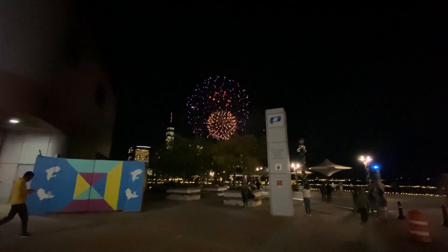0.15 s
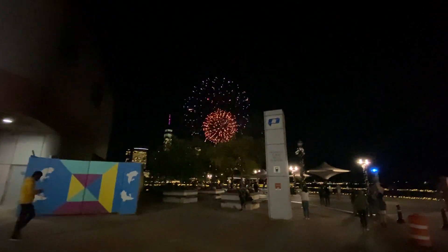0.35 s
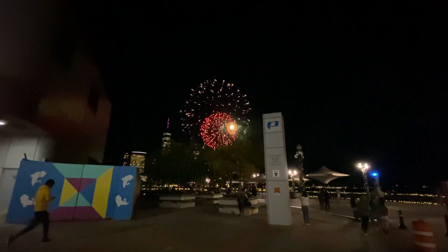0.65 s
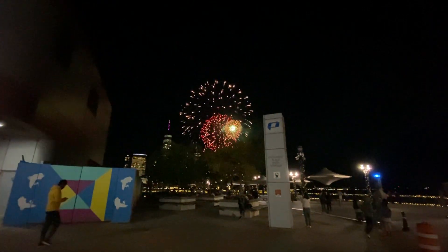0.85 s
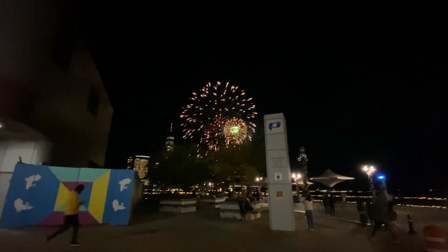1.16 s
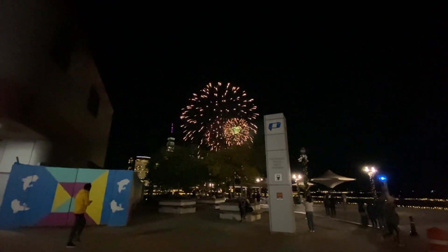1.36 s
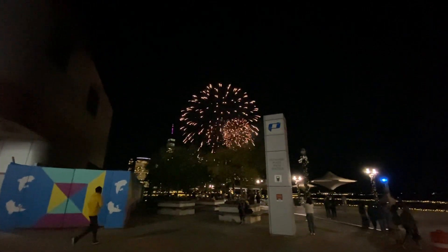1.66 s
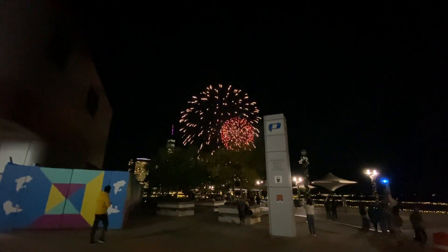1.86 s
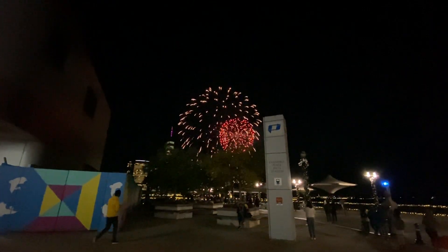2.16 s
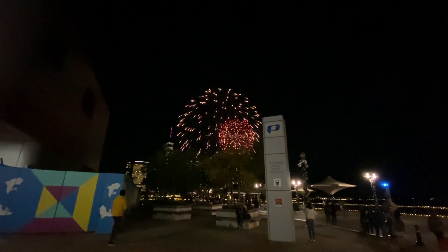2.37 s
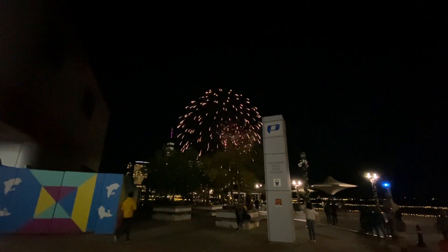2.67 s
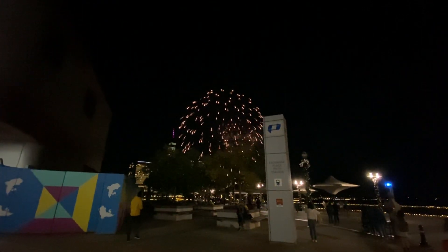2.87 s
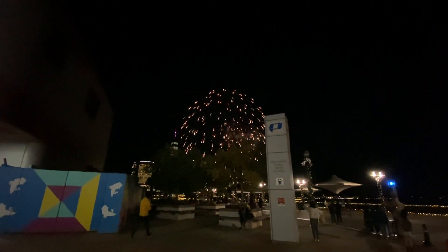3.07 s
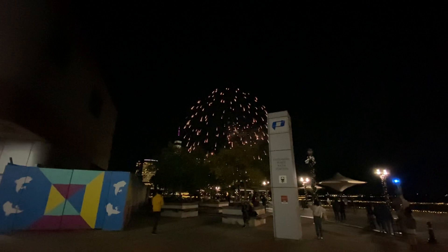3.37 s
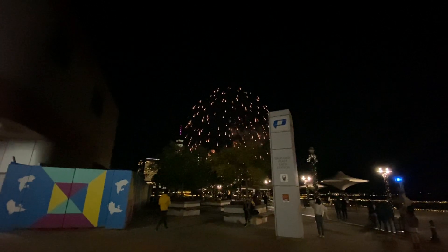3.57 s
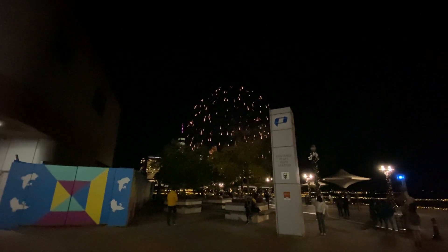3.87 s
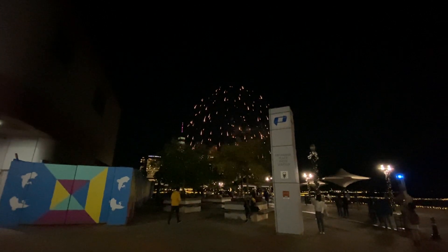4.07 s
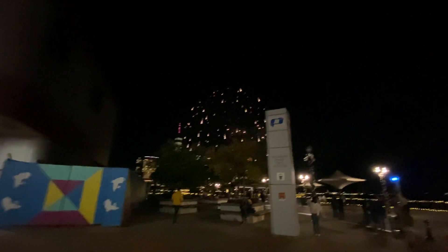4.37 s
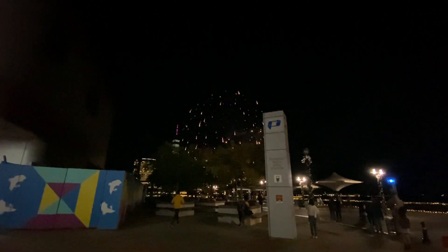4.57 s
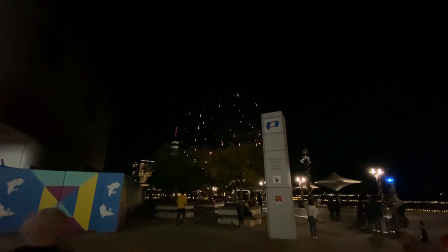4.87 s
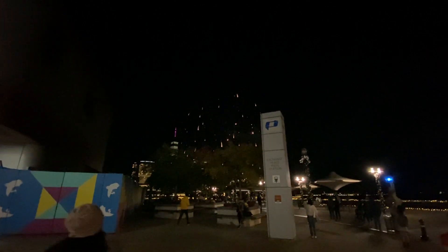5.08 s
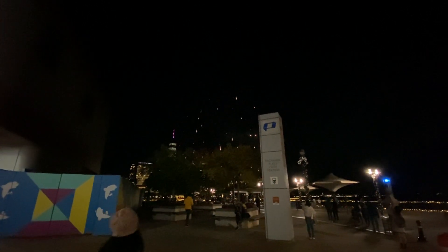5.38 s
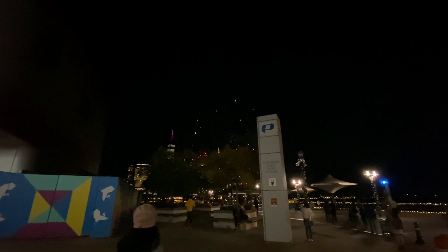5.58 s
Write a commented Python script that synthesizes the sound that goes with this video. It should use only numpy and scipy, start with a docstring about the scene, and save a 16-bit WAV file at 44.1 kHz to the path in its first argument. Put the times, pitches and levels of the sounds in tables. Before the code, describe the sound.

Distant firework shells crack and boom over an open waterfront at night, each slapping off nearby walls and rolling away in long dull rumbles.

```python
"""Distant fireworks over a city waterfront

Firework shells burst far off at night. Each shock is a pressure jump with a ragged tail and a bounce off
the pavement. It slaps back from three nearby walls and from far facades, then rolls round the skyline as
filtered noise that grows duller. Stray thuds and cracks, made like the shocks, stand out of the roll.
Under it lie city rumble and faint hiss (coloured noise), small ticks (noise puffs) and a thin squeal."""
import sys
import numpy as np
from scipy import signal
from scipy.fft import rfft, irfft
from scipy.io import wavfile

SR = 44100
rng = np.random.default_rng(int(sys.argv[2]) if len(sys.argv) > 2 else 0)


def wav_record(signal):
    """Record a signal, one row per channel, as 16-bit PCM in the file named by sys.argv[1]."""
    frames = np.transpose(np.atleast_2d(signal))
    bounded = np.clip(frames, -1, 1)
    # unit amplitude maps onto the largest positive 16-bit level
    quanta = np.round(bounded * 32767).astype(np.int16)
    wavfile.write(sys.argv[1], SR, quanta)


N = 252693
TIME = np.arange(N) / SR  # seconds
FREQS = np.maximum(np.fft.rfftfreq(N, 1 / SR), 1)  # Hz

# The shells: start_s, level_db, overpressure_ms, treble_edge_hz, extra_delay_of_far_echoes_s
BURSTS = [(0.211, -10.5, 3.2, 300, 0.0098), (0.8642, 6, 9.9, 7730, 0.017), (2.4698, 8.5, 2, 3700, 0.00075),
          (5.115, -11, 6.6, 1800, 0.0036), (5.185, 4.5, 1.17, 2060, 0.0046),
          (5.3804, 5.5, 0.84, 2300, 0.0082)]


def from_db(db):
    """Turn decibels into a gain."""
    return 10 ** (np.asarray(db) / 20)


def rms_one(x):
    """Scale a signal to an rms of 1."""
    return x / np.sqrt(np.mean(x ** 2) + 1e-20)


def at_hz(points, hz):
    """Read a table between its points, along a log-frequency axis."""
    table = np.array(points)
    return np.interp(np.log(hz), np.log(table[:, 0]), table[:, 1])


def cut(x, hz, kind, order=2):
    """Butterworth filter: "low" keeps the lows, "high" keeps the highs."""
    edge_hz = np.clip(hz, 10, .45 * SR)
    return signal.sosfilt(signal.butter(order, edge_hz, kind, fs=SR, output="sos"), x)


def bell(x, hz, gain_db, q):
    """Resonant filter that lifts or dips the sound around one pitch; a higher q is narrower."""
    w, height = 2 * np.pi * hz / SR, from_db(gain_db / 2)
    damping = np.sin(w) / (2 * q) * np.array([1, 0, -1])
    centre = np.array([1, -2 * np.cos(w), 1])
    return signal.lfilter(centre + damping * height, centre + damping / height, x)


def envelope(start_s, length_s, attack_s, release_s):
    """Rise, hold, then die away exponentially."""
    age = np.maximum(TIME - start_s, 0)
    rise = 1 - np.exp(-age / attack_s)
    return rise * np.exp(-np.maximum(age - length_s, 0) / release_s)


def wander(hz):
    """Random drift slower than hz, with a spread near 1 and limited to 2 either way."""
    return np.clip(rms_one(cut(rng.standard_normal(N), hz, "low")), -2, 2)


def add(out, sound, s, lag_ms=0, pan_db=0):
    """Mix in a short sound; positive lag makes the left later, positive pan makes it louder."""
    for channel, part, side in zip(out, sound * np.ones((2, 1)), (.5, -.5)):
        at = max(round((s + side * lag_ms / 1000) * SR), 0)
        channel[at:at + len(part)] += from_db(side * pan_db) * part[:max(N - at, 0)]


def spread(pair, colour):
    """Colour two unrelated noises and mix them as middle and side, giving a stereo spectrum."""
    # Stereo width: pitch_hz, side_against_middle_db
    width_table = [(60, -13.5), (120, -6), (250, -10.5), (500, 4), (1000, 8.5), (2000, 2), (4000, -0.5),
                   (9000, 0.5)]
    # Balance: pitch_hz, left_against_right_db
    lean_table = [(60, -7), (100, 2), (180, -1), (320, 2.5), (560, 3.5), (970, 5.5), (1700, 2), (2970, 1.5),
                  (5190, 2.5), (9060, 0.5)]
    mid, side = rfft(pair)
    width = from_db(at_hz(width_table, FREQS))
    gain = rms_one(from_db(at_hz(colour, FREQS)))
    field = np.array([mid + width * side, mid - width * side]) / np.hypot(1, width)
    lean = from_db(at_hz(lean_table, FREQS) * np.array([[.5], [-.5]]))
    return field * gain * lean


def background():
    """Broad noise whose level drifts makes the city rumble; treble noise that comes and goes is the hiss."""
    # City colour: pitch_hz, level_db per Hz
    city_colour = [(20, -17.5), (40, -4.5), (65, -1.5), (130, -2), (250, -11.5), (370, -14), (500, -19.5),
                   (800, -22), (1200, -30.5), (2100, -39), (3500, -49.5), (6000, -58), (9000, -64.5),
                   (13000, -67.5)]
    # Hiss colour: pitch_hz, level_db per Hz
    hiss_colour = [(2000, -32), (3500, -3), (5000, 4.5), (6300, -2.5), (7800, -1), (9000, -9.5),
                   (10500, -18), (15000, -22.5)]
    # Spells of hiss: start_s, length_s, level_db
    hiss_spells = [(0.177, 1.52, -66.5), (2.26, 1.1, -69.5), (4.078, 0.29, -62.5), (4.6, 3.3, -71)]
    city_db, surge_db, surge_hz = -32.5, 1.1, 4
    city = irfft(spread(rng.standard_normal((2, N)), city_colour), N)
    hiss = irfft(spread(rng.standard_normal((2, N)), hiss_colour), N)
    swells = 0
    for s, length_s, level_db in hiss_spells:
        swells = swells + from_db(level_db) * envelope(s, length_s, attack_s=0.046, release_s=0.15)
    return from_db(city_db + surge_db * wander(surge_hz)) * city + swells * hiss


def squeal(waver_rate_hz=70, waver_width_hz=60, flicker_db=3.0, flicker_hz=8, pan_db=-14):
    """One narrow, unsteady line on the right, as from a rubbing brake, creeping up in pitch and level."""
    start_s, length_s, fade_s = 4.08, .82, 0.027
    start_hz, rise_hz_per_s = 8620, 190
    start_db, rise_db_per_s = -83, 4.5
    age = np.clip(TIME - start_s, 0, length_s)
    hz = start_hz + rise_hz_per_s * age + waver_width_hz * wander(waver_rate_hz)
    level_db = start_db + rise_db_per_s * age + flicker_db * wander(flicker_hz)
    tone = np.sqrt(2) * np.sin(2 * np.pi * np.cumsum(hz) / SR)
    tone = tone * envelope(start_s, length_s, fade_s, fade_s)
    return tone * from_db(level_db + pan_db * np.array([[.5], [-.5]]))


def ticks():
    """Small hard contacts close by: bright puffs of noise that die away fast."""
    # Ticks: start_s, level_db, fall_by_60_db_s, left_against_right_db, lower_edge_hz, upper_edge_hz
    tick_table = [(0.118, -61.5, 0.12, -3.5, 3500, 6470), (0.227, -56, 0.026, -7, 5000, 6200),
                  (0.604, -55, 0.017, 4, 5500, 10000), (1.006, -34, 0.012, 4, 2800, 6000),
                  (1.651, -64, 0.02, 0, 6000, 10000), (2.187, -60, 0.054, -2, 3000, 5500),
                  (2.652, -55, 0.075, 7, 3200, 6760), (2.668, -52, 0.047, 12, 3200, 6650),
                  (2.948, -47, 0.0037, 4, 4000, 8800), (3.158, -55.5, 0.011, 1, 9000, 15000),
                  (3.671, -63, 0.012, 0, 7000, 14000), (4.114, -48.5, 0.033, 12, 2570, 6440),
                  (4.13, -46.5, 0.026, -9, 2600, 7000), (4.779, -56, 0.016, 0, 3200, 6800),
                  (5.599, -52.5, 0.088, 7, 3500, 4300)]
    out, age = np.zeros((2, N)), TIME[:SR // 10]
    for s, level_db, t60, pan_db, low_hz, high_hz in tick_table:
        grit = cut(rng.standard_normal(len(age)), low_hz, "high", order=3)
        grit = rms_one(cut(grit, high_hz, "low", order=4))
        add(out, grit * from_db(level_db - 60 * age / t60), s, pan_db=pan_db)
    return out


def echo_swarm(per_s=1100, size_spread_db=4, smooth=0.93, clump_db=0.64, clump_hz=22):
    """Countless facades return clicks of random size, in clumps; the farthest merge into noise."""
    sizes = from_db(size_spread_db * np.clip(rng.standard_normal((2, N)), -2, 2))
    sizes = sizes * rng.choice([-1, 1], (2, N))
    clicks = rms_one(sizes * (rng.random((2, N)) < per_s / SR))
    swarm = clicks + smooth * rng.standard_normal((2, N))
    return rms_one(swarm * from_db(clump_db * wander(clump_hz)))


def shifting_hollows(x, depth_db=-6.0, spread_s=.012, shift_hz=2.5, low_hz=250, count=3):
    """Close groups of echoes of changing spacing make narrow peaks and hollows drift at an even level."""
    age, out = TIME[:SR // 25], x
    shares = np.array([wander(shift_hz) for _ in range(count)])
    # the groups trade places, so their total strength stays even
    for share in shares / np.linalg.norm(shares, axis=0):
        group = rng.standard_normal((2, len(age))) * np.exp(-age / spread_s)
        group = group / np.linalg.norm(group, axis=1, keepdims=True)
        echoes = signal.fftconvolve(x, group, axes=1)[:, :N]
        out = out + from_db(depth_db) * share * cut(echoes, low_hz, "high")
    return rms_one(out)


def rolls(spreading=1.55):
    """Ever farther echoes: weaker by spreading, duller by the air, fuller where tall blocks cluster."""
    # One roll per shell: level_db, hold_s, bass_edge_hz, treble_edge_hz, boom_pitch_hz, boom_gain_db
    roll_table = [(-21.5, 0.16, 45, 230, 160, -0.5), (-14.5, 0.7, 32, 2760, 84, 1.5),
                  (-14.5, 0.14, 95, 1980, 160, 5.5), (-30.5, 0.27, 40, 200, 80, -1),
                  (-8.5, 0.13, 360, 960, 480, 1.5), (-11.5, 0.096, 410, 1320, 340, 4)]
    # One more roll without a shock of its own: start_s, then columns as above
    extra_roll = (0.58, -30, 0.4, 33, 1399, 79.5, 1.5)
    # Colour of a fresh roll: pitch_hz, level_db per Hz
    roll_colour = [(25, -31), (55, -1.5), (85, 2.5), (130, -6.5), (190, -3.5), (260, -10.5), (370, -12),
                   (500, -16), (750, -19), (1100, -23), (1700, -30), (2700, -31.5), (3700, -38),
                   (6000, -37.5), (9000, -47), (14000, -75.5)]
    # Loss to the air: pitch_hz, loss_db per second
    air_loss = [(60, 1.5), (300, 3), (1000, 4), (2000, 5), (4000, 16), (8000, 46.5)]
    # Clusters of tall blocks: delay_s, spread_s, gain_db, extra_treble_db per octave
    districts = [(0.169, 0.058, -1.4, 1.4), (0.55, 0.14, 2, 0.65), (1.36, 0.13, 3, -2.5), (1.8, 0.13, 5, 0)]
    delay_after_shell_s, rise_s, boom_width_octaves, district_treble_hz = 0.037, 0.12, 0.43, 1000
    surge_db, surge_hz = 1.13, 9
    field, out = spread(shifting_hollows(echo_swarm()), roll_colour), np.zeros((2, N))
    slow = TIME[::64]  # coarse time steps are enough for levels
    shells = [extra_roll]
    for burst, roll in zip(BURSTS, roll_table):
        shells.append((burst[0] + delay_after_shell_s, *roll))
    # overlapping bands, half an octave apart, each with its own level over time
    for hz in 20 * 2 ** np.arange(0, 10, .5):
        band = irfft(field * np.maximum(1 - 2 * np.abs(np.log2(FREQS / hz)), 0), N)
        power, treble_octaves = 0, max(np.log2(hz / district_treble_hz), 0)
        for s, level_db, hold_s, bass_hz, treble_hz, boom_hz, boom_db in shells:
            age = np.maximum(slow - s, 0)
            shell = 1 / (1 + (bass_hz / hz) ** 2) / (1 + (hz / treble_hz) ** 4)
            body_db = boom_db * np.exp(-(np.log2(hz / boom_hz) / boom_width_octaves) ** 2)
            swell = (1 - np.exp(-age / rise_s)) / (1 + (age / hold_s) ** spreading)
            skyline_db = 0
            for delay_s, spread_s, gain_db, bright_db in districts:
                nearness = np.exp(-((age - delay_s) / spread_s) ** 2)
                skyline_db = skyline_db + (gain_db + bright_db * treble_octaves) * nearness
            total_db = level_db + body_db + skyline_db - at_hz(air_loss, hz) * age
            power = power + shell * swell * from_db(total_db) ** 2
        # each band surges by itself as echoes cancel and add
        surge = from_db(surge_db * wander(surge_hz))
        out += band * np.interp(TIME, slow, np.sqrt(power)) * surge
    return out


def pavement(x, level_db, delay_ms=2.54, edge_hz=4000):
    """The ground repeats the sound a moment later, which combs its colour."""
    bounce = [np.interp(TIME - delay_ms / 1000, TIME, channel) for channel in x]
    return x + from_db(level_db) * cut(bounce, edge_hz, "low")


def clutter(x, level_db, t60, low_hz):
    """Trees, posts and benches scatter a short spray of echoes behind every shock."""
    age = TIME[:SR // 3]
    spray = rng.standard_normal((2, len(age))) * from_db(-60 * age / t60)
    spray = cut(spray / np.sqrt(np.sum(spray ** 2) / 2), low_hz, "high")
    return from_db(level_db) * signal.fftconvolve(x, spray, axes=1)[:, :N]


def shock(level_db, push_ms, edge_hz, ragged_db=-5, ragged_t60=.026, ragged_hz=600, unlike=.9, order=5):
    """A blast wave: pressure jumps, falls through zero into suction and recovers; air rounds its front."""
    age = TIME[:SR // 8]
    phase = age * 1000 / max(push_ms, .1)
    wave = cut((1 - phase) * np.exp(-phase), edge_hz, "low", order=order)
    # eddies and nearby edges split the front into a ragged string of steps, a little unlike on each side
    scatter = rng.standard_normal(len(age)) + unlike * rng.standard_normal((2, len(age)))
    scatter = scatter * from_db(-60 * age / ragged_t60)
    scatter = cut(scatter / np.linalg.norm(scatter[0]), ragged_hz, "high")
    steps = signal.fftconvolve(wave[None], scatter, axes=1)[:, :len(age)]
    return from_db(level_db) * (wave + from_db(ragged_db) * steps)


def stray_reports():
    """Single thuds and cracks from far shells, and from walls that catch only one burst."""
    # Strays: start_s, level_db, overpressure_ms, treble_edge_hz, raggedness_db,
    # ragged_part_fall_by_60_db_s, left_against_right_db
    strays = [(0.243, -21, 3.4, 1240, 4.5, 0.15, -5), (0.289, -9, 2.4, 300, -1, 0.018, -9),
              (0.529, -10.5, 0.88, 300, -13, .03, -12), (0.9262, -16.5, 1.3, 1700, 4, .03, -5),
              (0.9652, -7, 1.8, 4600, 3.5, 0.03, 5), (0.976, -5.5, 3.5, 250, -8, .04, 1),
              (1.0178, -6.5, 0.54, 2500, 2, .025, -1), (1.108, -6, 1.2, 500, 1, .06, 0),
              (1.339, -24.5, 0.33, 3600, 7, .1, -1), (1.352, -13, 2.8, 700, -2, .06, -4),
              (1.389, -14.5, 0.28, 3200, 7, 0.25, 1), (1.462, -5, 1.6, 480, -1, 0.11, -2),
              (1.547, -13, 2.2, 330, -3, 0.043, 0), (1.985, -28, .6, 1510, 4, 0.16, 4),
              (2.005, -4, 2.5, 220, -5, 0.044, -2), (2.164, -20, 0.12, 2760, 3.5, 0.034, 11),
              (2.189, -8.5, 5.5, 543, -9, 0.03, -2), (2.5638, -11, 0.45, 3370, 5, .035, 2),
              (2.576, 1.5, 2.3, 318, -8, 0.043, -2), (2.589, -13, 0.2, 3000, 10.5, 0.24, 4.5),
              (2.598, -9, 1.1, 1300, -4.5, 0.051, 1), (2.646, -15.5, 0.6, 2600, 11.5, 0.45, 4),
              (2.721, -5.5, 1, 806, -8, 0.1, -4), (2.785, 0, 1.06, 403, -12, 0.073, 1),
              (2.85, -4.5, 1.6, 300, -6, .04, 1), (2.931, -15, 1.2, 2890, 7, 0.021, -1),
              (3.082, -9.5, 1.8, 458, -8, 0.055, -1), (3.24, -23, 0.62, 1700, 5, 0.097, 5),
              (3.456, -7, 1.33, 280, -5.5, 0.027, 4), (3.533, -25.5, 0.69, 2400, 6, 0.077, 7),
              (3.646, -24, 0.61, 1100, 1, .02, 5), (3.707, -23, 0.73, 1100, -10, .03, 4),
              (3.74, -18, 0.97, 750, 9, 0.11, -4), (3.842, -18, 0.85, 800, 6.5, 0.13, -3),
              (3.895, -5.5, 1.7, 250, -6, 0.047, -2), (4.278, -33, 0.53, 1415, -10, .03, 0),
              (4.315, -18, 1.4, 300, -4, .04, -1), (4.704, -18, 0.36, 650, -2, .04, 23),
              (4.955, -21, 1.9, 260, -2.5, .03, 8), (5.045, -16.5, 1.5, 300, 0, .03, -2),
              (5.116, -2, 3, 191, -8.5, .03, -5.5), (5.195, -13, 0.26, 3140, -2, 0.012, 3),
              (5.284, -26.5, 0.28, 4500, -1, .03, -2), (5.3904, -21, .26, 3500, 2, .012, 1),
              (5.483, 0.5, 1.7, 560, -3, 0.035, 0)]
    out = np.zeros((2, N))
    for s, level_db, push_ms, edge_hz, ragged_db, ragged_t60, pan_db in strays:
        report = shock(level_db, push_ms, edge_hz, ragged_db, ragged_t60, ragged_hz=377)
        add(out, report, s, pan_db=pan_db)
    return out


def facade_echoes():
    """Single far facades repeat each shock: weaker, duller and more ragged."""
    # Facades: delay_s, level_against_shock_db, share_of_overpressure_time, treble_edge_hz
    facades = [(0.102, -13, 0.59, 644), (0.119, -18.5, .7, 1395), (0.141, -20.5, .3, 2400),
               (0.29, -13.5, 0.35, 335), (0.381, -16.5, 0.5, 234), (0.4633, -25, 0.3, 3070),
               (0.601, -23.5, .5, 450), (0.9895, -19.5, 1.4, 125), (1.1726, -43.5, 0.18, 1390),
               (1.374, -33.5, .35, 850)]
    out = np.zeros((2, N))
    for s, level_db, push_ms, edge_hz, extra_s in BURSTS:
        for delay_s, echo_db, push_share, facade_hz in facades:
            echo_hz = 1 / np.hypot(1 / edge_hz, 1 / facade_hz)  # duller than either edge alone
            echo = shock(level_db + echo_db, push_ms * push_share, echo_hz, ragged_db=4.0, ragged_t60=0.033)
            add(out, echo, s + delay_s + extra_s)
    return out


def bursts():
    """Each direct shock and its slaps off the side, near and back walls."""
    # Each shell bursts at another spot in the sky, so its ways to the walls differ: side_delay_ms,
    # near_delay_ms, near_level_db, back_delay_ms, back_level_db, back_treble_edge_hz
    wall_paths = [(10.6, 53, -12, 140, -8, 650), (8.9, 52.6, -7, 90.4, -6, 6300),
                  (11, 58.5, -5.5, 93.2, -2, 1100), (9, 61, -7, 102, 2.5, 1400),
                  (8.7, 59.6, -7, 101, -7, 1000), (8.3, 59.2, -9, 99.7, -7.5, 3900)]
    # Each shell's own hollow, from the middle to the treble: pitch_hz, gain_db
    shell_dips = [(6200, -3), (6100, -11), (3380, -7.5), (1200, -14), (4800, -4), (950, -1)]
    side_db, side_edge_share, side_lag_ms = -2.5, 0.54, -0.36
    # the near and back walls pull the shock towards their own length, the near wall also towards its edge
    near_push_ms, near_edge_hz, near_pan_db = 1.6, 2200, 0.5
    back_push_ms, back_lag_ms = 2.2, 0.44
    sharp_front_hz = 5500  # the sharpest crack has a bright edge near 8.9 kHz on the right
    out = np.zeros((2, N))
    for burst, path, (dip_hz, dip_db) in zip(BURSTS, wall_paths, shell_dips):
        s, level_db, push_ms, edge_hz, _ = burst
        side_ms, near_ms, near_db, back_ms, back_db, back_hz = path
        direct = shock(level_db, push_ms, edge_hz, ragged_db=-0.5, ragged_t60=0.021, order=4)
        direct = bell(direct, dip_hz, dip_db, q=2.4)
        if edge_hz > sharp_front_hz:
            direct[1] = bell(direct[1], hz=8850, gain_db=15, q=7)
        add(out, direct, s)
        side_slap = shock(level_db + side_db, push_ms, edge_hz * side_edge_share, order=4)
        add(out, side_slap, s + side_ms / 1000, side_lag_ms)
        near_slap = shock(level_db + near_db, np.sqrt(push_ms * near_push_ms),
                          np.sqrt(edge_hz * near_edge_hz), ragged_db=-1.0, ragged_t60=0.032, order=7)
        add(out, near_slap, s + near_ms / 1000, pan_db=near_pan_db)
        back_slap = shock(level_db + back_db, np.sqrt(push_ms * back_push_ms), back_hz,
                          ragged_db=-0.5, ragged_t60=0.016, order=4)
        add(out, back_slap, s + back_ms / 1000, back_lag_ms)
    return out


def scene():
    """Add up the shocks, their echoes and the night around them."""
    # Hollow upper middle, with a thump below and a bite above: pitch_hz, gain_db, q (sharpness, no unit)
    shock_colour = [(330, 4, 7.3), (624, -6.5, 2), (1180, 3, 7.2), (2450, -4, 0.39), (4330, 3, 2.4),
                    (6140, 4, 2.5)]
    shocks = pavement(bursts() + facade_echoes() + stray_reports(), level_db=-14.5)
    for hz, gain_db, q in shock_colour:
        shocks = bell(shocks, hz, gain_db, q)
    # the cracks are fuller on the left, where a building stands
    shocks = np.array([bell(shocks[0], hz=710, gain_db=5.5, q=1.7), shocks[1]])
    scattered = clutter(shocks, level_db=-12.0, t60=0.13, low_hz=90)
    rumble = pavement(rolls(), level_db=-23.5, delay_ms=3.17, edge_hz=16000)
    return shocks + scattered + rumble + background() + ticks() + squeal()


def record(dry, low_hz=43):
    """The microphone delays lows behind highs, so shocks swoop down; peaks are rounded, the top is cut."""
    turn_q, overload, cutoff_hz = 0.38, .89, 15800  # overload: the level that peaks cannot pass
    x = cut(dry, low_hz, "high", order=3)
    # all-pass filters turn the phase once round each of these pitches (Hz) and leave the levels alone
    for hz in [75, 160, 380, 1000]:
        w = 2 * np.pi * hz / SR
        damping = np.sin(w) / (2 * turn_q)
        poles = [1 + damping, -2 * np.cos(w), 1 - damping]
        x = signal.lfilter(poles[::-1], poles, x)
    x = x / (1 + (x / overload) ** 6) ** (1 / 6)
    return cut(x, cutoff_hz, "low", order=14)


dry = scene()
out = record(dry)
wav_record(out)
```